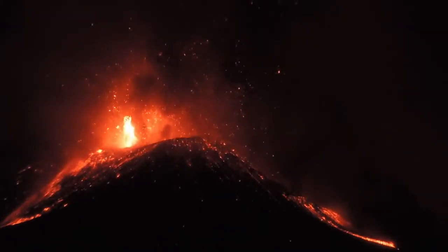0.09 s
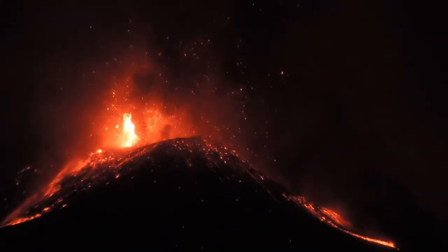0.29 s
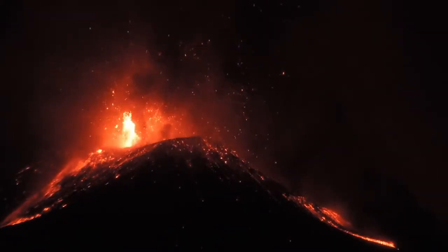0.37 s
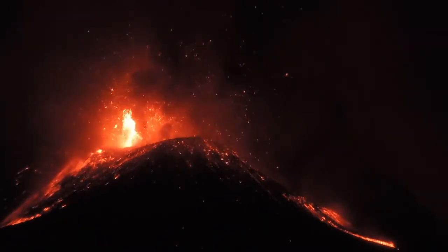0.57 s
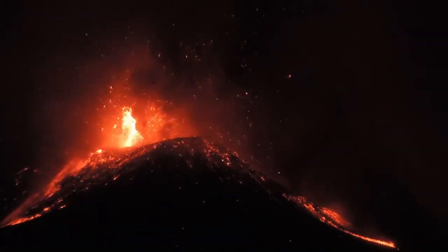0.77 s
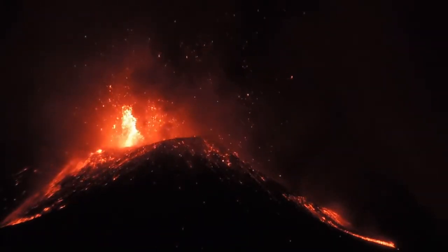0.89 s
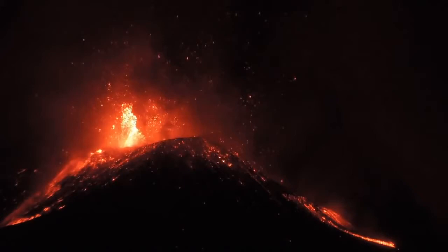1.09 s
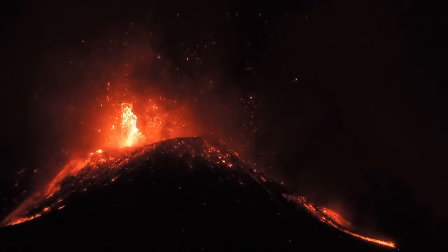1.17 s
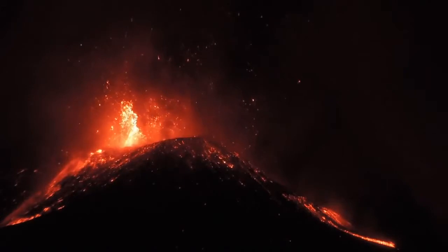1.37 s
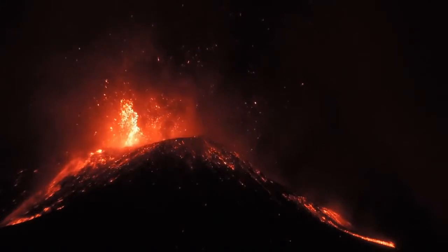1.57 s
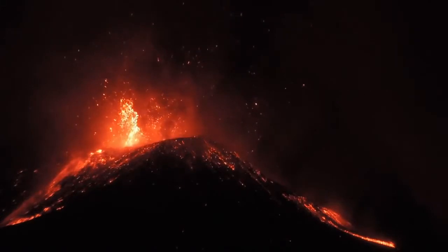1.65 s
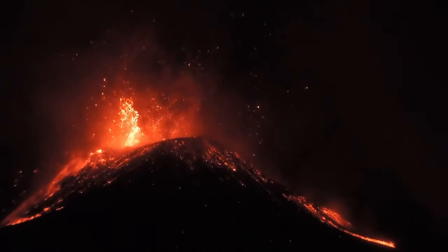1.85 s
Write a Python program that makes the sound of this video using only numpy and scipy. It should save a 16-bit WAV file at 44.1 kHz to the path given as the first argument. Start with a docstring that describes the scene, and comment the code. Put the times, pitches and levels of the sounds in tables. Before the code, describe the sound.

Deep volcanic blast swells far off, then fades in separate thuds under faint hiss and ticks

```python
"""Distant lava fountain at night

A surge of gas roars up far off, breaks into dull blasts and rolls away in separate thumps over a deep
rumble that darkens while it fades. Roar and rumble are dense random gas puffs, filtered and faded in bands;
each blast is a short low sine. Close by, faint dry ticks, perhaps falling cinders, ring very briefly among
a patter and gritty spatters of filtered impulses, over a steady hiss of filtered noise."""
import sys
import numpy as np
from scipy import signal
from scipy.fft import rfft, irfft
from scipy.io import wavfile
from scipy.ndimage import uniform_filter1d

SR = 44100
rng = np.random.default_rng(int(sys.argv[2]) if len(sys.argv) > 2 else 0)


def inscribe(sig):
    """Save sig as 16-bit PCM at rate SR to the path in sys.argv[1].

    A 1-D sig is mono; a 2-D sig holds one channel per row.
    Samples are clipped to [-1, 1] before scaling.
    """
    pcm = np.round(np.clip(np.atleast_2d(sig).T, -1, 1) * 32767)
    wavfile.write(sys.argv[1], SR, pcm.astype(np.int16))


N = 81585  # length in samples


def undb(db):
    """Turn decibels into gain."""
    return 10 ** (np.asarray(db) / 20)


def unit(x):
    """Scale to rms 1."""
    return x / np.sqrt(np.mean(x ** 2) + 1e-18)


def pan(left_minus_right_db):
    """Left and right gains for a level difference; positive leans left."""
    return undb(np.array([[left_minus_right_db], [-left_minus_right_db]]) / 2)


def curve(table, column=1):
    """Gain over time, drawn straight in dB between the rows of a table."""
    rows = np.array(table)
    level_db = np.interp(np.arange(N) / SR, rows[:, 0], rows[:, column])
    return undb(level_db)


def colour(x, spectrum):
    """Filter to a spectrum that falls 12 dB more per octave past its last point; rms 1."""
    point_hz, point_db = np.array(spectrum).T
    # double length leaves room for the wrap-around of the transform
    hz = np.maximum(np.arange(N + 1) * SR / (2 * N), 1)
    gain = undb(np.interp(np.log(hz), np.log(point_hz), point_db))
    gain = gain / np.maximum(hz / point_hz[-1], 1) ** 2
    filtered = irfft(rfft(x, 2 * N) * gain)
    return unit(filtered[..., :N])


def impulses(per_s, spread_db):
    """Single-sample pushes of random size and direction at random moments."""
    hit = rng.random(N) < per_s / SR
    size = undb(spread_db * rng.standard_normal(N).clip(-2, 2))
    direction = np.sign(rng.standard_normal(N))
    return hit * size * direction


PUFFS_PER_S, PUFF_SPREAD_DB = 970, 3.5
EVEN_S, EVEN_SHARE = 0.0347, 0.84  # averaging window; share of the level swings taken out


def churn(spectrum, side_db):
    """Dense gas puffs dulled by distance, levelled out and nearly the same in both ears."""
    mid = colour(impulses(PUFFS_PER_S, PUFF_SPREAD_DB), spectrum)
    power = uniform_filter1d(mid ** 2, int(EVEN_S * SR)) + 1e-9
    mid = unit(mid / power ** (EVEN_SHARE / 2))
    side = undb(side_db) * colour(rng.standard_normal(N), spectrum)
    return np.array([mid + side, mid - side])


# strength of the surge: start_s, rumble_level_db, upper_rumble_level_db, roar_level_db
SURGE_LEVELS = [(0, -55.5, -57, -64.5), (.09, -58, -59, -66.5), (.15, -45.5, -47.5, -52.5),
                (.26, -40, -45, -47), (.47, -37, -38, -40.5), (.52, -34.5, -34.5, -37.5),
                (.61, -38, -34, -38.5), (.67, -30, -36.5, -46), (.81, -37, -38.5, -49.5),
                (1.0, -35.5, -37.5, -52.5), (1.2, -40.5, -46.5, -57), (1.4, -41.5, -52, -61.5),
                (1.6, -43.5, -46.5, -63), (1.75, -43.5, -59, -64), (1.85, -49.5, -52, -72)]
# strength of the deepest bass: start_s, level_db
DEEP_LEVELS = [(0, -57), (.25, -47.5), (.47, -45.5), (.6, -33), (.73, -43.5), (.85, -33.5), (1.08, -37.5),
               (1.35, -41.5), (1.85, -49)]
# spectrum of the main rumble: pitch_hz, level_db (per Hz, relative)
RUMBLE_SPECTRUM = [(35, -37), (55, -10.5), (76, -7.5), (102, -1), (130, -4.5), (165, -18), (220, -36),
                   (400, -48)]
# spectrum of the upper rumble: pitch_hz, level_db (per Hz, relative)
UPPER_SPECTRUM = [(90, -12), (125, -9.5), (168, 2.5), (205, -10), (245, -11), (310, -23.5), (500, -47.5)]
# spectrum of the gas roar: pitch_hz, level_db (per Hz, relative)
ROAR_SPECTRUM = [(130, -10), (220, -3.5), (285, -3.5), (340, 3), (460, 0.5), (550, -8.5), (650, -16),
                 (800, -32), (1300, -54)]
# spectrum of the deepest bass: pitch_hz, level_db (per Hz, relative)
DEEP_SPECTRUM = [(8, -7), (18, -10), (26, -9), (34, -13), (49, -4.5), (62, -8), (100, -33)]
RUMBLE_SIDE_DB, ROAR_SIDE_DB, DEEP_SIDE_DB = -18, -17.5, -17  # side against mid
RUMBLE_PAN_DB, ROAR_PAN_DB, DEEP_PAN_DB = 0.5, 0.5, -3.8  # left minus right


def fountain():
    """Four bands of churning gas; the roar dies away soonest and the low rumble lingers."""
    rumble = churn(RUMBLE_SPECTRUM, RUMBLE_SIDE_DB) * curve(SURGE_LEVELS, column=1) * pan(RUMBLE_PAN_DB)
    upper = churn(UPPER_SPECTRUM, RUMBLE_SIDE_DB) * curve(SURGE_LEVELS, column=2)
    roar = churn(ROAR_SPECTRUM, ROAR_SIDE_DB) * curve(SURGE_LEVELS, column=3) * pan(ROAR_PAN_DB)
    deep = churn(DEEP_SPECTRUM, DEEP_SIDE_DB) * curve(DEEP_LEVELS) * pan(DEEP_PAN_DB)
    return rumble + upper + roar + deep


# spectrum of the hiss: pitch_hz, level_db (per Hz, relative)
HISS_SPECTRUM = [(100, 6), (400, 0.5), (800, 3.5), (1300, 0.5), (2000, -1), (3000, -6.5), (5000, -11.5),
                 (8000, -14.5), (13000, -16.5), (15000, -21)]
HISS_MID_DB, HISS_SIDE_DB = -60, 0.2  # side against mid


def hiss():
    """Steady background noise, wide because its mid and side are independent."""
    mid, side = colour(rng.standard_normal((2, N)), HISS_SPECTRUM)
    side = side * undb(HISS_SIDE_DB)
    return undb(HISS_MID_DB) * np.array([mid + side, mid - side])


# spectrum of the patter and spatters: pitch_hz, level_db (per Hz, relative)
PATTER_SPECTRUM = [(500, -17.5), (1200, 13.5), (2200, 10), (4000, 6.5), (8000, 2.5), (14000, 2)]
PATTER_PER_S, PATTER_DB, PATTER_SPREAD_DB, PATTER_PAN_SPREAD_DB = 240, -72.5, 6, 6


def patter():
    """Faint filtered impulses, each thrown to its own place between left and right."""
    hits = impulses(PATTER_PER_S, PATTER_SPREAD_DB)
    place_db = PATTER_PAN_SPREAD_DB * rng.standard_normal(N)
    placed = hits * undb(np.array([place_db, -place_db]) / 2)
    return undb(PATTER_DB) * colour(placed, PATTER_SPECTRUM)


# nearby ticks: start_s, pitch_hz, level_db (before grit), rise_s, left_minus_right_db
TICK_EVENTS = [(.09, 13700, -47.5, .0002, -12), (.2005, 12800, -44, 0.00038, -6),
               (.242, 2830, -48, 0.0005, 1), (.4993, 1950, -41.5, 0.00036, 0),
               (.5134, 3600, -41.5, 0.00027, 0), (0.623, 1390, -33.5, 0.00043, -1),
               (.7115, 1870, -42.5, 0.00039, -4), (.7115, 4900, -39, 0.000058, 4),
               (1.1097, 1400, -40.5, 0.00028, -4), (1.1097, 6500, -44.5, .0001, 1),
               (1.295, 11900, -47, 0.000088, -9), (1.3502, 10900, -44.5, 0.00013, -5),
               (1.3594, 10000, -44, 0.00013, 0), (1.6246, 10900, -48.5, 0.00038, 1),
               (1.678, 2620, -47, 0.00027, 2), (1.8396, 2260, -43, 0.0002, -9)]
TICK_GRIT = 2.1  # depth of the noise on a 10 kHz ring, before smoothing
TICK_ROUNDNESS = 2.8  # exponent: higher makes a softer start and a shorter tick


def ticks():
    """Tiny dry contacts that ring very briefly; the higher the pitch, the grittier."""
    out = np.zeros((2, N))
    age = np.arange(512) / SR
    for start, hz, db, rise, pan_db in TICK_EVENTS:
        noise = uniform_filter1d(rng.standard_normal((2, len(age))), size=4)
        grit = TICK_GRIT * hz / 10000 * noise
        ring = np.sin(2 * np.pi * hz * age) * (1 + grit)
        shape = (age / rise * np.exp(1 - age / rise)) ** TICK_ROUNDNESS  # tops out at 1 after rise
        tick = undb(db) * pan(pan_db) * ring * shape
        i = int(start * SR)
        out[:, i:i + len(age)] += tick[:, :N - i]
    return out


# gas blasts in the vent: start_s, pitch_hz, level_db (before shaping), length_s (to 17 dB down)
BLAST_EVENTS = [(0.192, 124, -28, 0.028), (.272, 95.5, -23, 0.03), (.328, 94.4, -30, 0.099),
                (.508, 82.8, -15.5, 0.044), (.574, 88, -19, 0.035), (.594, 156, -18, .03),
                (.627, 123, -24, 0.017), (.732, 95.2, -27, 0.06), (.782, 102, -29, 0.074),
                (.899, 64.5, -19, 0.019), (.944, 93, -20, 0.017), (.993, 93.5, -21.5, 0.015),
                (1.036, 59, -27, 0.059), (1.104, 104, -21.5, 0.028), (1.132, 81, -28, 0.071),
                (1.197, 73.6, -27.5, 0.045), (1.238, 71, -24, 0.024), (1.277, 105, -27, 0.027),
                (1.314, 93, -26.5, .03), (1.398, 101, -29, 0.02), (1.493, 71, -32.5, 0.036),
                (1.581, 105, -26, 0.017), (1.801, 66, -30.5, 0.027), (1.839, 87, -25.5, 0.016)]
BLAST_RISE_S, BLAST_FALL = 0.0047, 2.35  # time constant of the onset; exponent of the fall


def blasts():
    """Each bursting gas pocket rings the vent as a short low sine."""
    out = np.zeros(N)
    for start, hz, db, length in BLAST_EVENTS:
        age = np.maximum(np.arange(N) / SR - start, 0)
        rise = 1 - np.exp(-age / BLAST_RISE_S)
        fall = np.exp(-2 * (age / length) ** BLAST_FALL)
        out += undb(db) * rise * fall * np.sin(2 * np.pi * hz * age)
    return out * pan(RUMBLE_PAN_DB)


# brief gritty spatters: middle_s, level_db, length_s (middle to 8.7 dB down), left_minus_right_db
SPATTER_EVENTS = [(0.245, -61, 0.015, -5), (0.703, -58, 0.0037, -16), (0.786, -65.5, 0.015, 7),
                  (1.1, -58.5, 0.005, -1), (1.42, -58, 0.0037, -9), (1.476, -57, 0.002, 1),
                  (1.546, -63, 0.0081, -1), (1.839, -58, 0.0046, 1)]
SPATTER_PER_S, SPATTER_SPREAD_DB = 1300, 3


def spatters():
    """Little clusters of grains: brief bell-shaped swells open onto a dense stream of impulses."""
    t = np.arange(N) / SR
    swell = np.zeros((2, N))
    for middle, db, length, pan_db in SPATTER_EVENTS:
        bell = np.exp(-((t - middle) / length) ** 2)
        swell += undb(db) * pan(pan_db) * bell
    return swell * colour(impulses(SPATTER_PER_S, SPATTER_SPREAD_DB), PATTER_SPECTRUM)


def scene():
    """The distant eruption with the small sounds nearby."""
    return fountain() + hiss() + patter() + ticks() + blasts() + spatters()


TOP_HZ = 14200


def record(dry):
    """The recorder cuts the top with a steep low-pass."""
    # 0.2 dB ripple below the cutoff, 70 dB rejection above
    low_pass = signal.ellip(8, .2, 70, TOP_HZ, fs=SR, output="sos")
    return signal.sosfilt(low_pass, dry)


dry = scene()
out = record(dry)
inscribe(out)
```